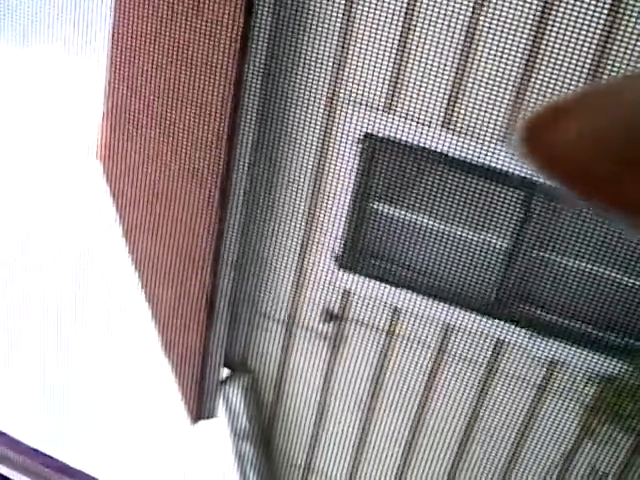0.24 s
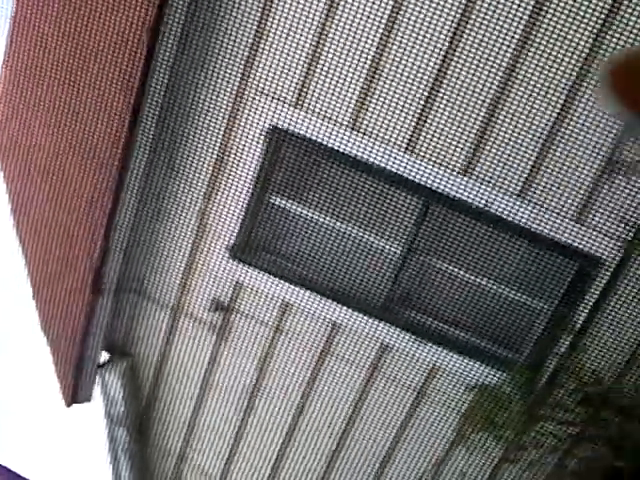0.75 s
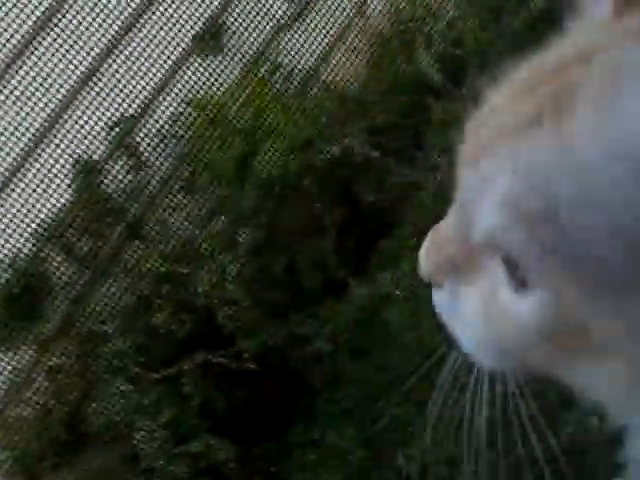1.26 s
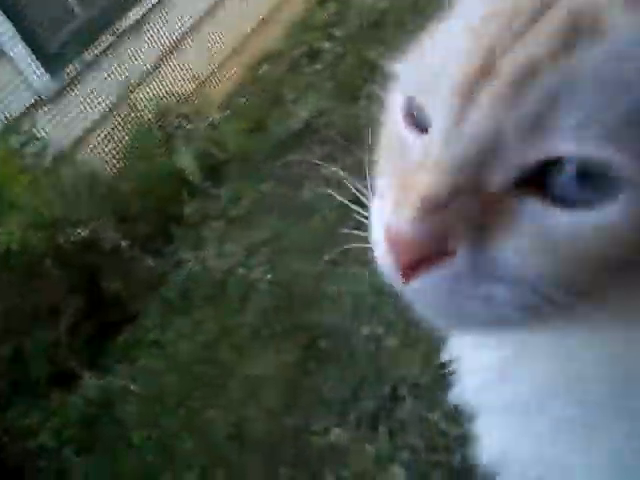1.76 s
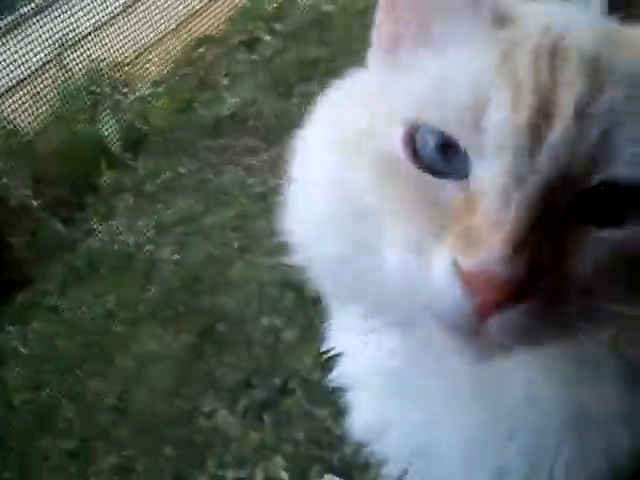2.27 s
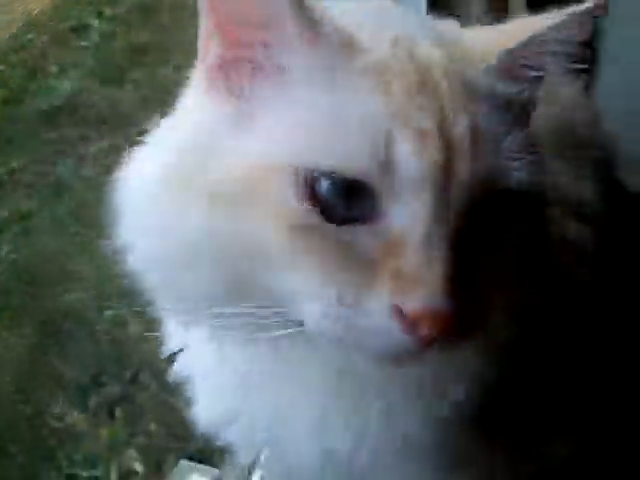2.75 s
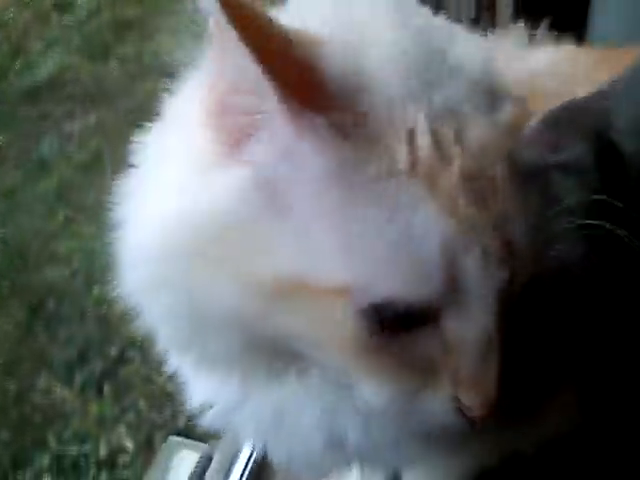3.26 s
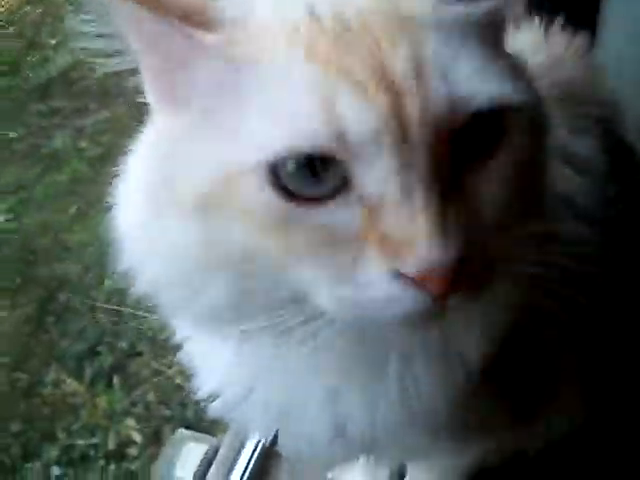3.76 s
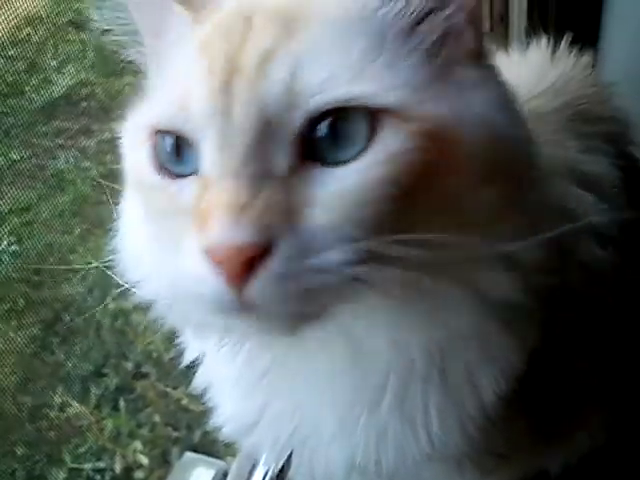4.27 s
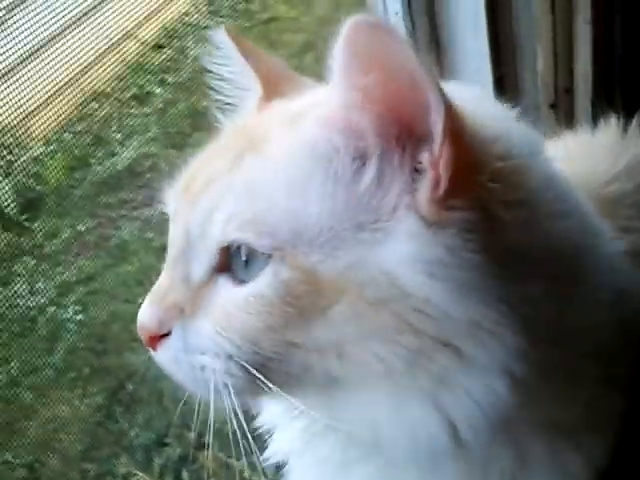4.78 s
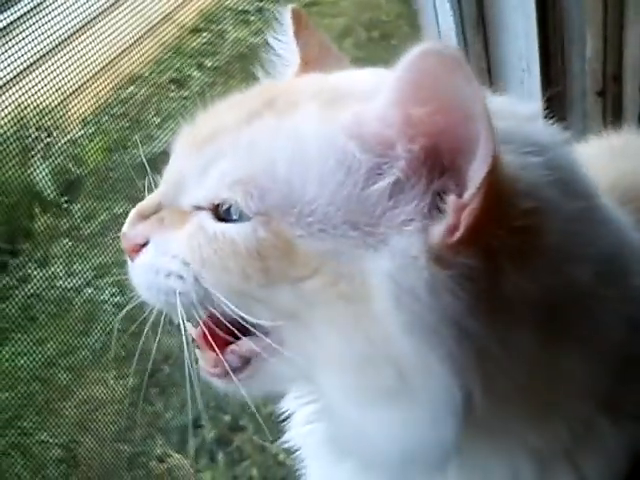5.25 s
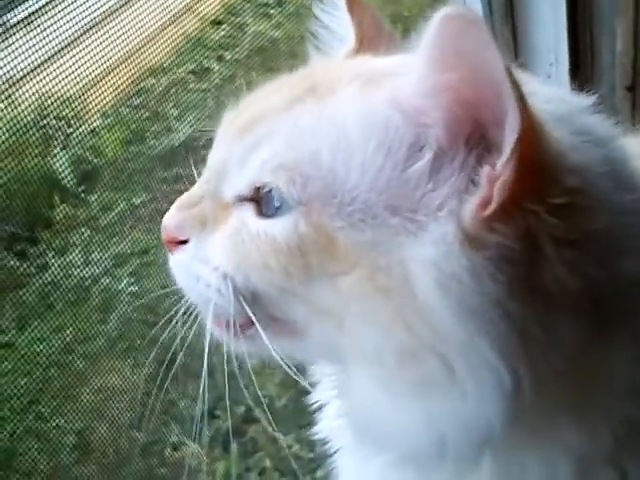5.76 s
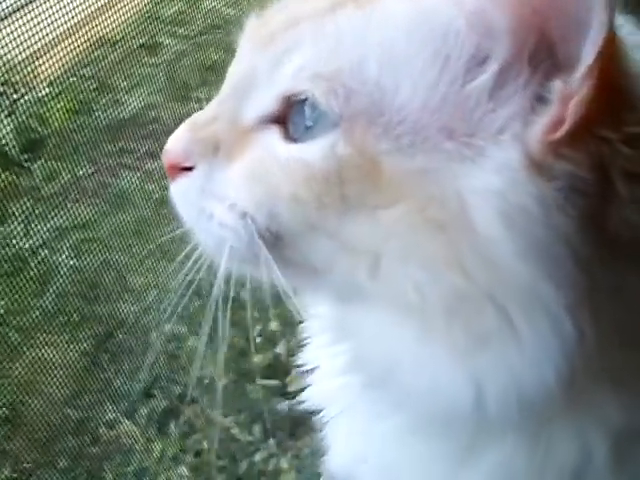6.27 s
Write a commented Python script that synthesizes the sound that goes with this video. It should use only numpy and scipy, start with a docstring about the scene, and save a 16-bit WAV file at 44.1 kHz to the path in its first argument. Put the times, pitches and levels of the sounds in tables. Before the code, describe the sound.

A cat sits very close to a hand-held microphone at an open screened window. A short high mew comes early, then scattered wet clicks, fur rustles and dull handling bumps. After a quieter pause it squeaks briefly, clicks, and chatters in rapid broken bleats with hissing breath, ending in a long thin fading meow. Soft outdoor air and far traffic continue underneath.

```python
"""An open screened window: a cat mews once, squeaks, then chatters and trails off in a long thin meow.
The voice is harmonics shaped by three mouth resonances; the squeak is two gliding sines.
Wet mouth clicks and bumps on the hand-held microphone are struck modes; hissing breath and fur rustle
are grainy noise through resonances. Outdoor air, far traffic and a low hum are filtered noise."""
import sys
import numpy as np
from scipy import signal
from scipy.io import wavfile
from scipy.ndimage import uniform_filter1d

SR = 44100
rng = np.random.default_rng(int(sys.argv[2]) if len(sys.argv) > 2 else 0)


def store_wav(level_fs):
    """Save 16-bit WAV to argv[1]."""
    pcm = np.round(np.clip(np.atleast_2d(level_fs), -1, 1) * 32767)
    wavfile.write(sys.argv[1], SR, pcm.T.astype(np.int16))


N = 287532

# Long thin end of the meow: time_s, pitch_hz, fundamental_db, mouth_hz, mouth_db, upper_hz, upper_db,
# palate_db
TAIL = [(5.89, 829, -45, 2227, -46.5, 3670, -63, -75), (5.97, 824, -46, 2200, -48.5, 3244, -56, -84),
        (6.02, 809, -46, 2110, -50, 3280, -57, -81), (6.055, 817, -47.5, 2126, -53.5, 3240, -56, -79),
        (6.09, 799, -47, 1993, -57, 3201, -57, -79), (6.112, 819, -52.5, 1990, -59, 3470, -64, -89),
        (6.13, 801, -49.5, 1952, -58, 3180, -56, -86), (6.15, 837, -52, 2033, -68, 3450, -68, -86),
        (6.19, 831, -50, 2004, -55, 3793, -69, -91), (6.222, 858, -50, 1970, -63, 3620, -65, -92)]


def voice():
    """Clean harmonics; three steep resonances lift and delay the overtones that fall into them."""
    # Single mew: time_s, pitch_hz, fundamental_db, mouth_hz, mouth_db, upper_hz, upper_db, palate_db
    mew = [(0.393, 815, -46, 2000, -41, 3420, -77, -95), (0.398, 836, -40.5, 2050, -38, 3350, -48, -91),
           (0.408, 885, -42.5, 2430, -34, 3770, -52, -67),
           (0.435, 836, -38, 2050, -35.5, 3400, -51.5, -60.5),
           (0.455, 886, -42.5, 2310, -42, 3600, -54.5, -84.5), (0.478, 830, -44, 2100, -44, 3380, -60, -81),
           (0.488, 834, -55.5, 1870, -61, 3400, -73, -104), (0.52, 870, -62, 2400, -58, 3720, -72, -87)]
    # Spans in which the folds vibrate: start_s, end_s
    syllables = [(.392, .526), (5.081, 5.24), (5.335, 5.372), (5.482, 5.542), (5.565, 5.606), (5.62, 6.228)]
    palate_hz, half_width_hz = 4650, 600
    curves = in_time(mew + chatter_shape() + TAIL)
    pitch_hz, low_db, mouth_hz, mouth_db, upper_hz, upper_db, palate_db = curves
    jittered_hz = pitch_hz * (1 + .002 * drift(60))
    phase = 2 * np.pi * np.cumsum(jittered_hz) / SR
    tract = [(mouth_hz, mouth_db), (upper_hz, upper_db), (palate_hz, palate_db)]
    out = from_db(low_db) * np.cos(phase)
    for k in range(2, 10):
        # the top overtones have a floor that follows the palate level
        response = from_db(palate_db - 20) * (k > 6)
        for hz, db in tract:
            off = (k * jittered_hz - hz) / half_width_hz
            lag = np.exp(-.8j * np.arctan(off))
            response = response + from_db(db) / (1 + off ** 2) ** 2 * lag
        # higher overtones waver more
        shimmer = from_db((.4 + .4 * k) * drift(90))
        out += shimmer * np.real(response * np.exp(1j * k * phase))
    return -np.sqrt(2) * gate(syllables, fade_s=0.0017) * out


def chatter_shape():
    """Jaw beats as rows like TAIL: each opens from the last muting, holds while fading, and shuts."""
    # Jaw beats: start_s, length_s, rise_s, open_pitch_hz, late_pitch_hz, shut_pitch_hz, fundamental_db,
    # fundamental_fade_db, shut_muting_db, mouth_hz, mouth_db, mouth_fade_db, upper_hz, upper_db,
    # palate_db, upper_and_palate_fade_db
    beats = [(5.084, 0.047, 0.0064, 824.4, 814, 740, -45, -1.5, 11, 2180, -40.5, 3, 3690, -50, -53, -6),
             (5.132, 0.091, .009, 821.6, 816, 830, -48.5, 0, 4, 2300, -44, 5, 3700, -51.5, -58, 1.5),
             (5.335, .036, 0.0054, 855, 842, 842, -53, -0.5, 3.5, 2100, -43.5, 4, 3700, -60, -72, 6.5),
             (5.483, 0.055, 0.0056, 858, 835, 820, -46, 7, 11, 2150, -39.5, 6, 3785, -55, -73, 4),
             (5.564, 0.047, .006, 827.6, 820, 838, -52, -0.5, 7, 2200, -49, 2, 3600, -63.5, -72, 4),
             (5.619, 0.031, 0.0048, 824, 826, 830, -43, 6, 3.5, 2150, -38, 3.5, 3550, -44, -59, 7),
             (5.654, 0.057, .018, 810.6, 808, 822, -41, 4.5, 8, 1850, -41.5, -0.5, 3300, -45, -48.5, 1),
             (5.715, .057, .009, 801, 820, 800, -41.5, 1.5, 4.5, 2100, -32.5, 3.5, 3480, -44.5, -42.5, 1.5),
             (5.771, 0.059, 0.018, 822.4, 810, 804, -45.5, 1.5, 8.5, 2250, -35.5, -0.5, 3780, -42.5, -53, 3.5),
             (5.834, 0.038, 0.0043, 824, 830, 815, -44.5, -1.5, 3.5, 2297, -37, 10.5, 3950, -41.5, -59, 3)]
    closing_s, min_gap_s = 0.017, 0.001
    mouth_climb_hz, start_sharp_hz = 150, 5
    # the resonances are muted more than the fundamental
    mouth_swing, upper_swing, palate_swing = 1.3, 2, 2.2
    rows, before_db = [], -0.5
    next_starts_s = [row[0] for row in beats[1:]] + [TAIL[0][0]]
    for beat, next_s in zip(beats, next_starts_s):
        start_s, length_s, rise_s, open_hz, late_hz, shut_hz, low_db, fade_db, shut_db = beat[:9]
        mouth_hz, mouth_db, mouth_fade_db, upper_hz, upper_db, palate_db, top_fade_db = beat[9:]
        length_s = min(length_s, next_s - start_s - min_gap_s)
        # after_s, pitch_hz, share of the fade, muting_db
        points = [(0, open_hz + start_sharp_hz, 0, before_db),
                  (rise_s, open_hz, 0, 0),
                  (max(length_s - closing_s, rise_s), late_hz, 1, 0),
                  (length_s, shut_hz, 1, shut_db)]
        for after_s, pitch_hz, faded, muted_db in points:
            rows.append((start_s + after_s,
                         pitch_hz,
                         low_db - faded * fade_db - muted_db,
                         mouth_hz + mouth_climb_hz * after_s / length_s,
                         mouth_db - faded * mouth_fade_db - mouth_swing * muted_db,
                         upper_hz,
                         upper_db - faded * top_fade_db - upper_swing * muted_db,
                         palate_db - faded * top_fade_db - palate_swing * muted_db))
        before_db = shut_db
    return rows


def squeak():
    """A short arched squeak: two gliding sines, unsteady in pitch and level."""
    # Lower and upper partial: time_s, pitch_hz, level_db
    low_partial = [(4.505, 900, -57), (4.525, 1176, -58), (4.547, 1700, -46), (4.57, 1640, -42.5),
                   (4.578, 1754, -58.5), (4.6, 1650, -60)]
    high_partial = [(4.52, 2000, -56), (4.54, 2680, -54.5), (4.551, 2810, -58), (4.585, 2880, -60.5)]
    out = 0
    for rows in (low_partial, high_partial):
        hz, db = in_time(rows)
        phase = 2 * np.pi * np.cumsum(hz * (1 + .025 * drift(200))) / SR
        level = from_db(db + 3.8 * drift(110))
        out = out + gate([(rows[0][0], rows[-1][0])], fade_s=0.0066) * level * np.sin(phase)
    return np.sqrt(2) * out


def clicks():
    """Wet mouth clicks strike every mode at random strength; a snap, mostly weaker, follows in ms."""
    # Clicks: time_s, strength_db, upper_modes_re_lower_db
    click_rows = [(0.219, -33.5, -28), (0.224, -35.5, -27), (0.2746, -31.5, -10), (0.835, -49, -7),
                  (0.846, -48, -12), (0.899, -49, -4), (1.496, -39, -4), (1.5209, -29.5, -3),
                  (1.542, -40, -29), (1.6483, -36, -1), (1.659, -39, -7), (1.7686, -29, -0.5),
                  (2.0476, -45, 6), (2.0725, -42, 9), (2.078, -18, -9.5), (2.1837, -49, 5.5),
                  (2.2365, -43, 2), (2.2732, -39, 6), (2.2754, -32, 7.5), (2.5267, -39, -21),
                  (2.5538, -32.5, -3), (2.67, -46, -15), (2.7703, -43.5, -11), (2.87, -47, -9),
                  (4.807, -25, -11.5), (4.978, -37.5, 2.5), (4.99, -37.5, 9), (5.01, -25, 1.5),
                  (5.4101, -34, -2), (5.415, -39, -1), (5.438, -43, 2.5), (5.612, -41.5, 5)]
    # Lower and upper modes: pitch_hz, relative_db, t60_s
    lower_modes = [(2110, -4, 0.021), (2430, -1, 0.013), (2830, -4, 0.01)]
    upper_modes = [(3540, -10, 0.0059), (4100, -4.5, 0.0087), (4600, -7.5, 0.014), (5110, -9.5, 0.0091),
                   (7440, -2.5, 0.0068)]
    stagger_s = .0005
    time_s, strength_db, upper_db = np.transpose(click_rows)
    modes = [(mode, 0 * time_s - 6) for mode in lower_modes]
    modes += [(mode, upper_db - 2.5) for mode in upper_modes]
    chance = rng.standard_normal((len(time_s), 3 * len(modes) + 1))
    at = (time_s * SR).astype(int)
    snap_at = at + ((0.001484 + .0008 * np.abs(chance[:, -1])) * SR).astype(int)
    out = 0
    for k, ((hz, db, t60_s), share_db) in enumerate(modes):
        strikes = np.zeros(N)
        # the modes start slightly apart, with random sign
        apart = chance[:, k + 2 * len(modes)]
        first = np.sign(apart) * from_db(strength_db + db + share_db + 3.3 * chance[:, k])
        strikes[at + (stagger_s * np.abs(apart) * SR).astype(int)] = first
        strikes[snap_at] += .5 * first * chance[:, k + len(modes)]
        out = out + ring(strikes, hz, t60_s)
    # the source is too small to radiate bass
    no_bass = signal.butter(4, 1900, "high", fs=SR, output="sos")
    return signal.sosfilt(no_bass, out)


def hiss():
    """Turbulent breath through the open mouth: grainy, fluttering noise in two resonant ranges."""
    # Puffs: middle_s, rise_s, fall_s, upper_db, lower_db
    puffs = [(5.095, 0.031, 0.042, -54, -54.5), (5.219, 0.07, 0.15, -52.5, -57),
             (5.445, 0.032, 0.036, -47, -50), (5.55, 0.024, .02, -48, -56), (5.615, .025, 0.04, -45, -51.5),
             (6.245, .018, 0.011, -55.5, -56)]
    # Resonances of either range: pitch_hz, width_hz, relative_db
    upper_peaks = [(4150, 760, -14), (4720, 310, 3.5), (5290, 170, 3), (7180, 300, 1)]
    lower_peaks = [(1400, 1900, -6), (2390, 1100, 1.5), (3230, 650, 5.5)]
    upper, lower = sum(from_db([[up_db], [low_db]]) * swell(middle_s, rise_s, fall_s)
                       for middle_s, rise_s, fall_s, up_db, low_db in puffs)
    flutter = from_db(1.2 * drift(70))
    breath = grainy(per_s=1200, spread_db=4.5, share=.4) * flutter
    return upper * rms_one(resonate(breath, upper_peaks)) + lower * rms_one(resonate(breath, lower_peaks))


def room(x):
    """A decaying noise tail from the room behind the window."""
    t60_s, delay_s = 0.1, .006
    t = np.arange(int(.4 * SR)) / SR
    tail = rng.standard_normal(len(t)) * from_db(-60 * t / t60_s) * (t > delay_s)
    return signal.fftconvolve(x, tail / np.sqrt(np.sum(tail ** 2)))[:N]


def rustle():
    """Fur and fingers close by: dense ticks ringing near the click pitches, in swells."""
    # Swells: middle_s, rise_s, lower_db, upper_db
    swells = [(.22, 0.0094, -57, -64), (.63, 0.034, -60, -67.5), (1.2, 0.053, -61.5, -62.5),
              (1.38, 0.043, -65.5, -63), (1.545, 0.013, -66, -65), (1.651, 0.037, -53, -54.5),
              (1.81, 0.018, -82, -59), (2.028, 0.015, -58, -52.5), (2.092, 0.013, -59, -55.5),
              (2.239, 0.0054, -61, -54.5), (2.33, 0.031, -56.5, -59), (3.26, 0.015, -62, -61)]
    # Resonances of either range: pitch_hz, width_hz, relative_db
    lower_peaks = [(2390, 560, 3), (2800, 760, 1)]
    upper_peaks = [(3920, 590, 0), (4610, 900, -2.5), (5540, 270, -4.5), (7500, 1800, -12)]
    fall_over_rise = 1.37
    lower, upper = sum(from_db([[low_db], [up_db]]) * swell(middle_s, rise_s, fall_over_rise * rise_s)
                       for middle_s, rise_s, low_db, up_db in swells)
    grains = grainy(per_s=1500, spread_db=5, share=.45)
    # a second, broad resonance steepens the skirts
    steeper = resonate(resonate(grains, lower_peaks), [(2770, 5000, 0)])
    return lower * rms_one(steeper) + upper * rms_one(resonate(grains, upper_peaks))


def bumps():
    """The hand bumps the microphone casing and wakes its dull modes near each bump's own centre."""
    # Bumps: time_s, strength_db, centre_hz
    bump_rows = [(0.2046, -38, 1370), (0.2077, -41, 1010), (0.2102, -41, 670), (.795, -44, 600),
                 (1.837, -39, 110), (2.51, -35.5, 298), (2.513, -39, 760), (2.52, -42, 560),
                 (5.24, -40.5, 607)]
    # Casing modes: pitch_hz, relative_db, t60_s
    casing_modes = [(110, -1, 0.031), (332, 1.5, 0.029), (490, -6, 0.015), (641, -2.5, 0.029),
                    (790, -2.5, 0.058), (996, -1, 0.028), (1360, 7, 0.0057)]
    slope_db_per_octave = 19
    time_s, strength_db, centre_hz = np.transpose(bump_rows)
    out = 0
    for hz, db, t60_s in casing_modes:
        strikes = np.zeros(N)
        loss_db = slope_db_per_octave * np.abs(np.log2(hz / centre_hz))
        strikes[(time_s * SR).astype(int)] = -from_db(strength_db + db - loss_db)
        out = out + ring(strikes, hz, t60_s)
    return out


def air():
    """Outdoor air and far traffic: third-octave noise, levelled by register, flickering a little."""
    # Register levels: time_s, rumble_db, middle_db, presence_db, treble_db
    register_levels = [(0, -61, -61, -66.5, -71), (1.1, -64.5, -63, -66, -66), (2.3, -60, -59, -63.5, -62),
                       (2.9, -60.5, -59.5, -67.5, -65.5), (3.45, -60.5, -61, -70, -65),
                       (4.0, -59, -56, -62.5, -59), (4.45, -58.5, -55.5, -62.5, -60.5),
                       (5.6, -61.5, -56.5, -64, -67), (6.52, -63.5, -56, -63.5, -65.5)]
    # Relative spectral density within the registers: pitch_hz, density_db_per_hz
    colour = [(20, -7), (40, -3), (58, -0.5), (90, -8), (200, -7), (400, -15), (540, -19), (750, -11.5),
              (1100, -14.5), (2000, -22), (3500, -19), (5500, -25), (6300, -59.5), (7300, -29.5)]
    colour_hz, colour_db = np.transpose(colour)
    white = rng.standard_normal((2, N))
    edges_hz = 20 * 2 ** (np.arange(27) / 3)
    registers = np.zeros((4, N))
    for k, (low_hz, high_hz) in enumerate(zip(edges_hz, edges_hz[1:])):
        band_filter = signal.butter(2, [low_hz, high_hz], "band", fs=SR, output="sos")
        # neighbouring bands use separate noise
        band = signal.sosfilt(band_filter, white[k % 2])
        hz = np.sqrt(low_hz * high_hz)
        band_db = np.interp(np.log(hz), np.log(colour_hz), colour_db)
        register = int(hz > 300) + int(hz > 1500) + int(hz > 2800)
        registers[register] += from_db(band_db + 1.29 * drift(8.7)) * band
    levels = from_db(in_time(register_levels))
    return sum(level * rms_one(part) for level, part in zip(levels, registers))


def hum():
    """A wavering hum: noise twice through each narrow low resonance."""
    # Resonances: pitch_hz, width_of_each_pass_hz, level_db
    hum_rows = [(54.6, 85, -75.5), (121.6, 6.4, -72)]
    out = 0
    for hz, width_hz, db in hum_rows:
        peak = [(hz, width_hz, 0)]
        once = resonate(rng.standard_normal(N), peak)
        out = out + from_db(db) * rms_one(resonate(once, peak))
    return out


def from_db(db):
    """Decibels to amplitude ratio."""
    return 10 ** (np.asarray(db) / 20)


def rms_one(x):
    """Scale to rms 1."""
    return x / np.sqrt(np.mean(x ** 2) + 1e-20)


def in_time(rows):
    """Columns of a table as curves, sample by sample."""
    time_s, *columns = np.transpose(rows)
    return [np.interp(np.arange(N) / SR, time_s, column) for column in columns]


def drift(pole_hz):
    """Noise smoothed by two equal poles; rms 1."""
    r = np.exp(-2 * np.pi * pole_hz / SR)
    # the first second lets the filter settle
    smooth = signal.lfilter([1], [1, -2 * r, r * r], rng.standard_normal(N + SR))
    return rms_one(smooth[SR:])


def ring(strikes, hz, t60_s):
    """A unit strike sets a decaying sine of initial height 1 ringing."""
    r, w = from_db(-60 / (t60_s * SR)), 2 * np.pi * hz / SR
    return signal.lfilter([0, np.sin(w)], [1, -2 * r * np.cos(w), r * r], strikes + 1e-18)


def resonate(x, peaks):
    """Parallel two-pole resonances (pitch_hz, width_hz, level_db) with alternating signs."""
    out = 0
    for k, (hz, width_hz, db) in enumerate(peaks):
        r = np.exp(-np.pi * width_hz / SR)
        band = signal.lfilter([1, 0, -1], [1, -2 * r * np.cos(2 * np.pi * hz / SR), r * r], x)
        out = out + (-1) ** k * from_db(db) * (1 - r * r) / 2 * band
    return out


def grainy(per_s, spread_db, share):
    """White noise with a share of uneven random ticks; rms 1."""
    heights = from_db(spread_db * np.minimum(rng.exponential(1, N), 4))
    sizes = heights * rng.choice([-1, 1], N)
    ticks = rms_one(sizes * (rng.random(N) < per_s / SR))
    return rms_one(share * ticks + (1 - share) * rng.standard_normal(N))


def gate(spans, fade_s):
    """Open inside the spans, with soft edges."""
    t = np.arange(N) / SR
    is_open = sum((t >= start_s) & (t <= end_s) for start_s, end_s in spans) * 1.
    return uniform_filter1d(is_open, max(int(fade_s * SR), 1))


def swell(middle_s, rise_s, fall_s):
    """A Gaussian bell in time with a separate width for each side."""
    t = np.arange(N) / SR - middle_s
    return np.exp(-.5 * (t / np.where(t < 0, rise_s, fall_s)) ** 2)


def scene():
    """Everything at one microphone; only the cat excites the room."""
    cat = voice() + squeak() + clicks() + hiss()
    reverb = from_db(-18) * room(cat)
    return (cat + reverb + rustle() + bumps() + air() + hum())[None]


def record(dry):
    """A narrow dip in the treble near 6 kHz, then a roll-off; the top is cut; faint steady hiss stays."""
    dip_hz, dip_width_hz, dip_share = 6050, 500, .75
    rolloff_hz, cutoff_hz = 7200, 8000
    dipped = dry - dip_share * resonate(dry, [(dip_hz, dip_width_hz, 0)])
    rolled = signal.sosfilt(signal.butter(6, rolloff_hz, fs=SR, output="sos"), dipped)
    cut = signal.sosfilt(signal.cheby2(12, 70, cutoff_hz, fs=SR, output="sos"), rolled)
    return cut + from_db(-101) * rng.standard_normal(dry.shape)


dry = scene()
out = record(dry)
store_wav(out)
```